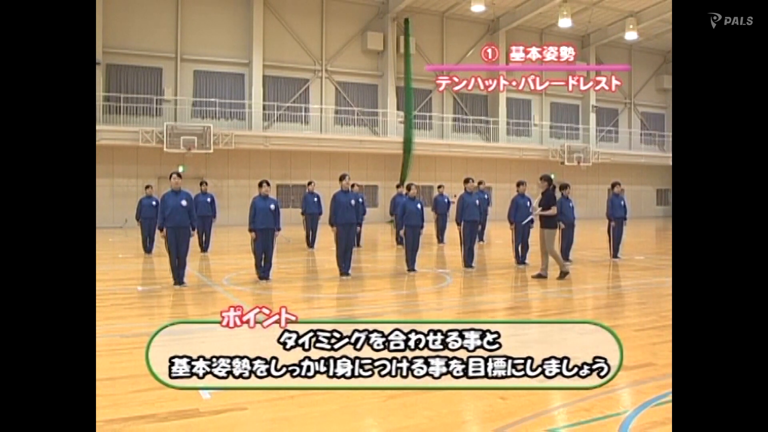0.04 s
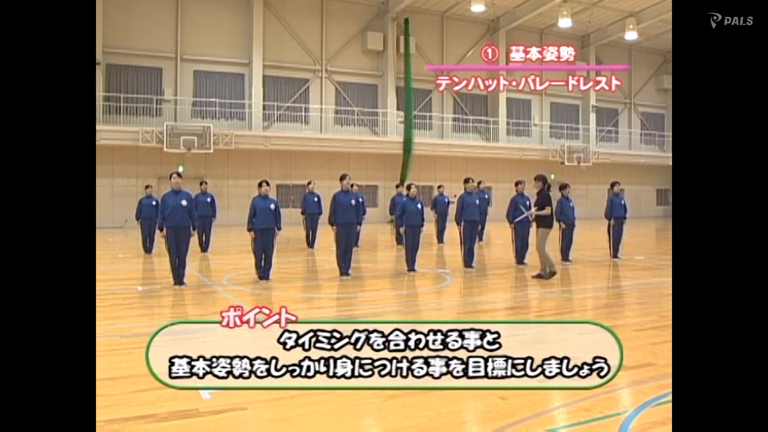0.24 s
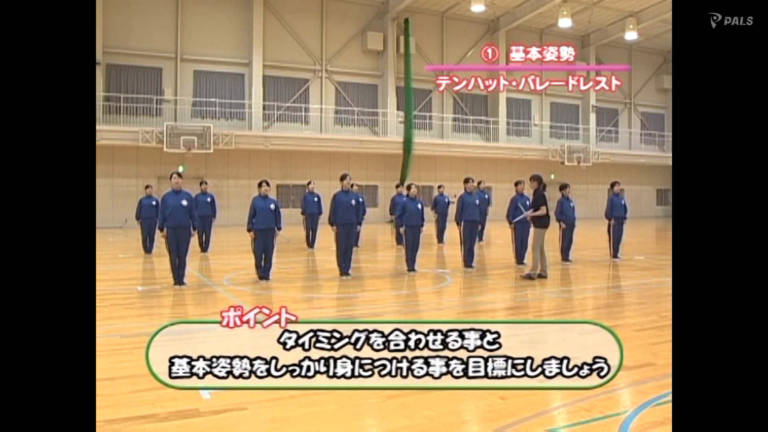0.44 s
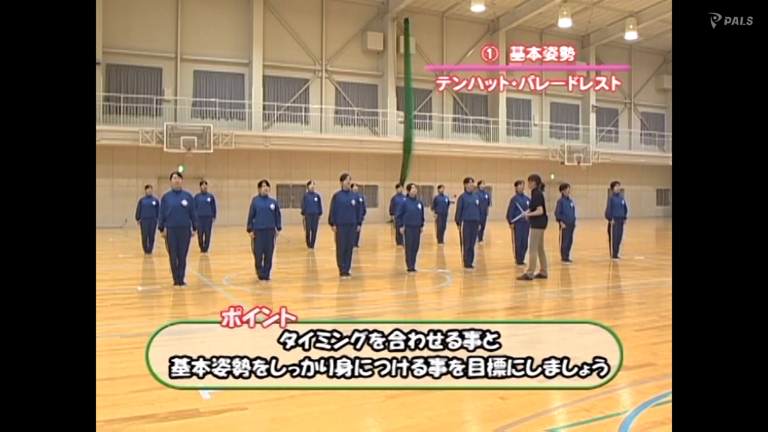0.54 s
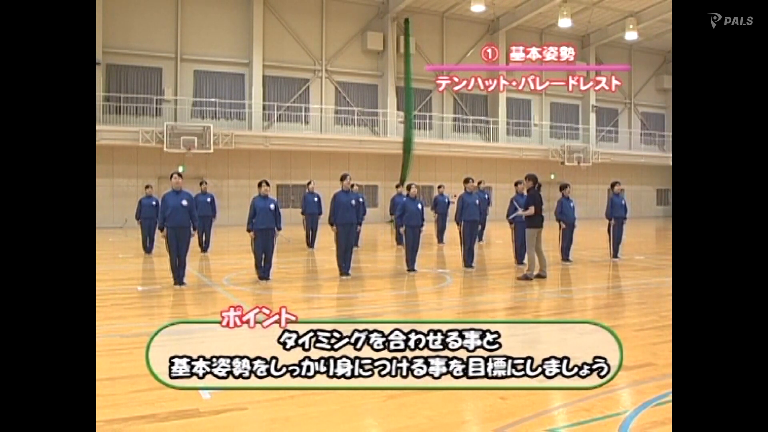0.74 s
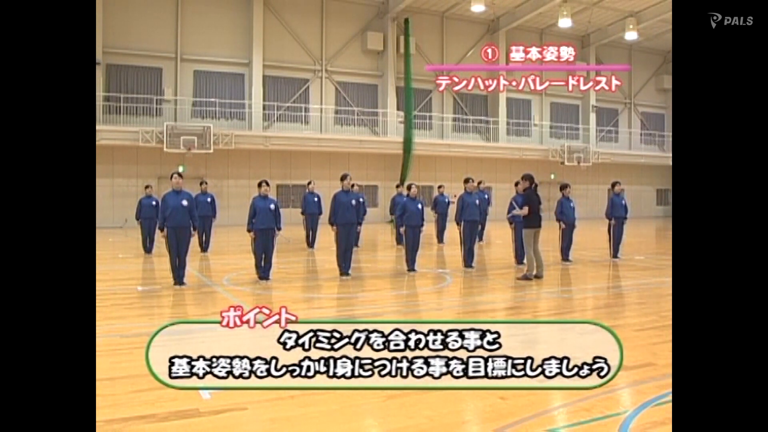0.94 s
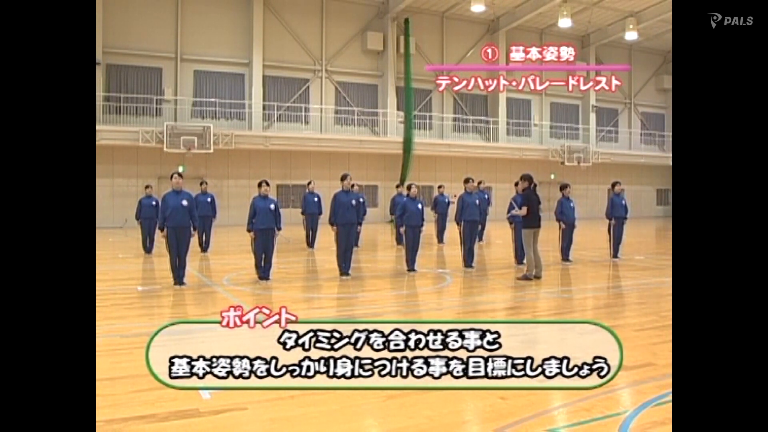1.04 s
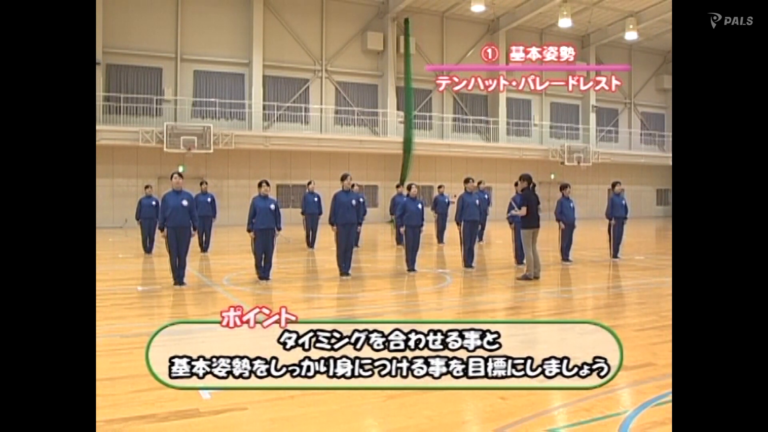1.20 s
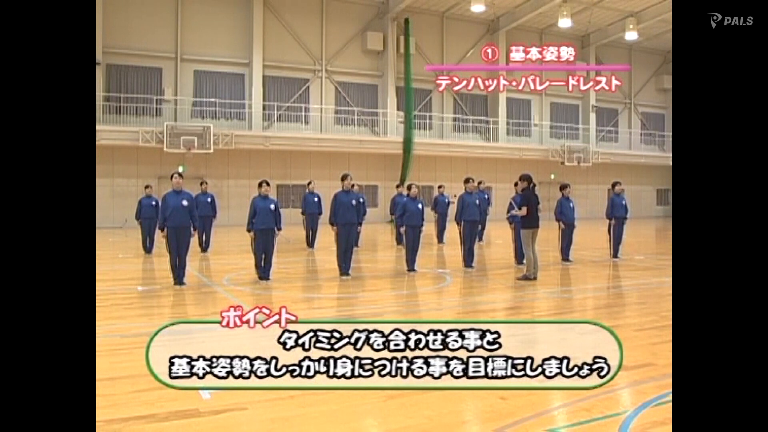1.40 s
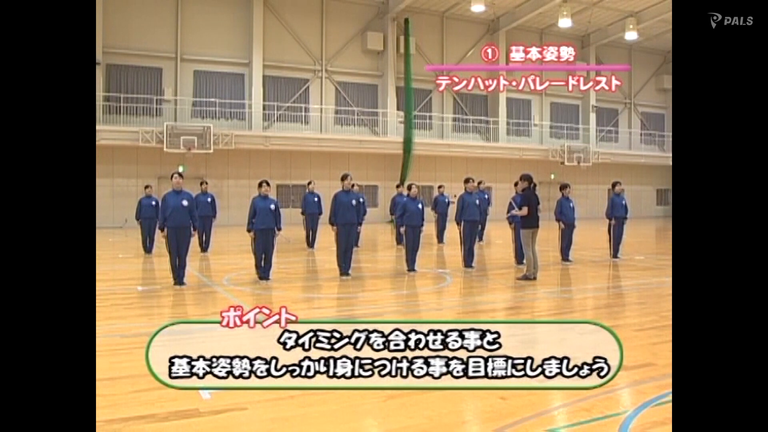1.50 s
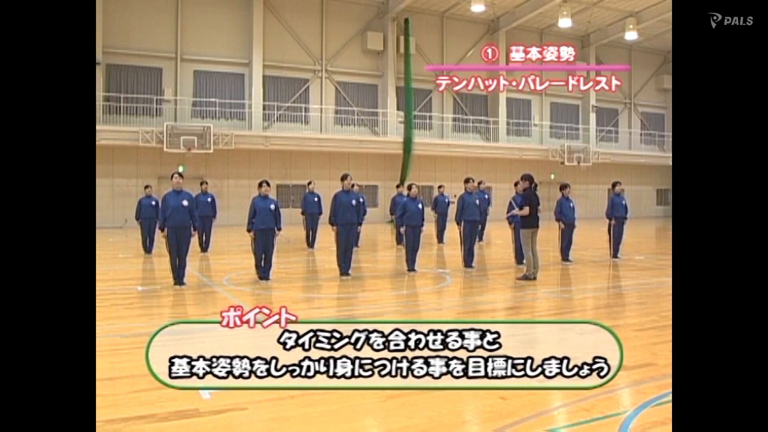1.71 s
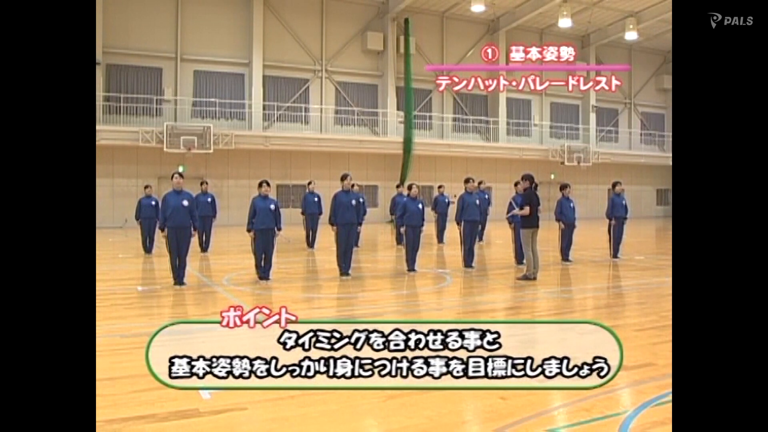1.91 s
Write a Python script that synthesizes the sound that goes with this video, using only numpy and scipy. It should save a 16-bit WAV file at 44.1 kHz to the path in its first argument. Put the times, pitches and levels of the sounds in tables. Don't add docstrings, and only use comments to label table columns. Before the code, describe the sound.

One sharp woody snap cracks close by, then rings on through a large wooden-floored gym

```python
import sys
import numpy as np
from scipy import signal
from scipy.fft import rfft, irfft
from scipy.io import wavfile
from scipy.ndimage import uniform_filter1d

SR = 44100
rng = np.random.default_rng(int(sys.argv[2]) if len(sys.argv) > 2 else 0)


def ratio(d):
    e = np.asarray(d, float) / 20
    return 10 ** e


def store_wav(level_fs):
    pcm = np.round(np.clip(np.atleast_2d(level_fs), -1, 1) * 32767)
    wavfile.write(sys.argv[1], SR, pcm.T.astype(np.int16))


N = 85995
T = np.arange(N) / SR
SNAP_S = 0.2152


def level(x, db):
    return x * ratio(db) / np.sqrt(np.mean(x ** 2))


def peak(x, db):
    return x * ratio(db) / np.max(np.abs(x))


def table(rows, hz):
    rows = np.array(rows, float)
    return np.interp(np.log(np.maximum(hz, 1)), np.log(rows[:, 0]), rows[:, 1])


def coloured(rows):
    spectrum = rfft(rng.standard_normal(N))
    shape = ratio(table(rows, np.fft.rfftfreq(N, 1 / SR)))
    return level(irfft(spectrum * shape, N), 0)


def double_band(x, hz, width_hz):
    b, a = signal.iirpeak(hz, hz / width_hz, fs=SR)
    return signal.lfilter(b, a, signal.lfilter(b, a, x))


def noise_band(hz, width_hz, db):
    return level(double_band(rng.standard_normal(N), hz, width_hz), db)


def butter(x, hz, kind="low"):
    return signal.lfilter(*signal.butter(2, hz, kind, fs=SR), x)


def fade(start_s, t60_s, rise_s):
    age = np.maximum(T - start_s, 0)
    return (1 - np.exp(-age / rise_s)) * ratio(-60 * age / t60_s)


def walk(rate_hz):
    k = int(SR / rate_hz)
    return level(uniform_filter1d(uniform_filter1d(rng.standard_normal(N), k), k), 0)


# (f/Hz, level/dB per Hz)
RUMBLE = [(18, -63.5), (30, -35.5), (113, -5.5), (152, -4), (260, -16.5), (521, -20.5), (590, -27),
          (678, -26), (1200, -50), (1560, -72.5), (2640, -120)]


def ventilation():
    rumble = coloured(RUMBLE) * ratio(-60 + 1.8 * walk(6))
    hum = noise_band(148, 60, -62.5) * ratio(2.3 * walk(12))
    return rumble + hum


# (f/Hz, level/dB per Hz)
HISS = [(590, -32), (1000, 1), (1840, -5.5), (3500, -5), (4450, -5), (5840, -7), (13500, -7.5)]


def hiss(db):
    top_hz = 14300
    edge = [(top_hz, HISS[-1][1]), (top_hz + 200, -60)]
    return coloured([*HISS, *edge]) * ratio(db)


# (t/s, peak level/dB, f/Hz, width/Hz)
FOOT_TICKS = [
    (.128, -54.5, 1136, 150),
    (.424, -47, 809.7, 1600),
    (.605, -45.5, 1200, 2800),
    (1.1065, -50.5, 760, 520),
]
# (t/s, length/s, level/dB, centre f/Hz, width/Hz)
SHUFFLES = [
    (1.142, .4, -71, 3600, 1600),
    (1.143, .37, -78, 1520, 100),
    (1.15, .22, -87, 10800, 3000),
    (1.63, .3, -73, 500, 150),
    (.13, .05, -63, 160, 70),
    (0, .22, -72, 400, 300),
    (1.15, .3, -80, 900, 500),
]


def feet():
    out = np.zeros(N)
    for start, db, hz, width in FOOT_TICKS:
        push = np.exp(-((T - start) * hz * 14) ** 2)
        out += peak(double_band(push, hz, width), db)
    for start, length, db, hz, width in SHUFFLES:
        rise = np.clip((T - start) / (0.047 * length), 0, 1)
        fall = np.clip(1.2 * (start + length - T) / length, 0, 1)
        grain = ratio(0.7 * walk(200))
        out += noise_band(hz, width, db) * rise * fall * grain
    return out


# (f/Hz, width/Hz, level/dB)
SNAP_RING = [(965.5, 50, -9.5), (1712, 74, -8.5), (1999, 72, -9), (2938, 190, -4), (3632, 77, 0.5),
             (4900, 280, -6)]
# (f/Hz, width/Hz, level/dB)
EARLIER_RING = [(813, 53, -3), (1155, 110, -4), (1650, 170, -6.5), (2000, 41, -12), (2594, 79, -5),
                (3000, 63, -10.5), (3600, 130, -10.5), (4900, 58, -23)]
# (f/Hz, level/dB per Hz)
WASH = [(240, -54.5), (400, -20), (953, -13), (1320, -19), (1970, -6.5), (2470, -10.5), (3580, -2),
        (4310, -14), (12000, -38), (15600, -67), (22000, -120)]
# (f/Hz, t60/s)
HALL_T60 = [(500, 2.2), (1000, 2.2), (2000, 2.35), (3600, 2.2), (5000, 1.8), (8000, .9), (12000, .5)]


def hall(start_s, ring, ring_db, wash_db):
    def tail(hz):
        return fade(start_s, table(HALL_T60, hz), 0.0019)

    out = np.zeros(N)
    for hz, width, db in ring:
        out += noise_band(hz, 1.5 * width, db + ring_db) * tail(hz)
    wash = coloured(WASH) * ratio(wash_db)
    for hz in 500 * 2 ** np.arange(0, 5, 0.5):
        b, a = signal.iirpeak(hz, 2, fs=SR)
        out += signal.lfilter(b, a, wash) * tail(hz)
    return out


def flutter():
    first_s, period_s, fade_s, depth_db = 0.29, 0.069, 0.35, 4
    age = T - first_s
    depth = depth_db * np.exp(-np.maximum(age, 0) / fade_s)
    return ratio(depth * np.cos(2 * np.pi * age / period_s) / 2)


# (delay t/s, level/dB, smear/s)
ECHOES = [(0.0265, -35.5, 0.0016), (.045, -53.5, 0.0056), (0.0564, -51, .003), (.063, -44.5, .004),
          (.074, -45, 0.0025), (0.133, -42.5, 0.0068), (.172, -47.5, .005), (.2, -48, .006),
          (0.271, -45.5, 0.014), (.33, -52, 0.0079), (.41, -54, .01)]


def early_echoes(x):
    reply = np.zeros(SR // 2)
    t = np.arange(len(reply)) / SR
    for lag, db, smear in ECHOES:
        decay = np.exp(-np.maximum(t - lag, 0) / smear) * (t >= lag)
        burst = rng.standard_normal(len(t)) * decay
        reply += ratio(db) * burst / np.sqrt(np.sum(burst ** 2))
    thin = signal.lfilter([2, -2 * 0.91], 1, x)
    return signal.fftconvolve(butter(thin, 10000), reply)[:N]


def floor_bounce(x):
    delay_s, db, top_hz = 0.0053, -11.5, 4570
    return ratio(db) * np.roll(butter(x, top_hz), int(delay_s * SR))


# (f/Hz, level/dB, t60/s)
WOOD = [(960, -29, 0.052), (1102, -18, 0.045), (1725, -17, 0.03), (2004, -7.5, 0.034), (2266, -33, 0.037),
        (2618, -16, 0.019), (2929, -6, 0.021), (3645, -3, 0.021), (4124, -12.5, 0.012),
        (4800, -24.5, 0.035), (5570, -20.5, 0.017), (5780, -47, 0.043), (5860, -42, 0.036),
        (6040, -35.5, 0.01733)]


def wood_ring():
    grip, contact_s = 0.85, 0.0012
    age = np.maximum(T - SNAP_S, 0)
    out = np.zeros(N)
    for (hz, db, t60), turn in zip(WOOD, rng.random(len(WOOD))):
        tone = np.sin(2 * np.pi * (hz * age + turn))
        out += ratio(db) * fade(SNAP_S, grip * t60, contact_s) * tone
    return out * ratio(1)


# (f/Hz, level/dB per Hz)
CRACK = [(180, -46.5), (300, -15.5), (1020, -1.5), (3400, -9), (4570, -15.5), (5480, -8), (6250, -19.5),
         (11300, -29.5), (15500, -40.5)]


def contact_crack():
    age = np.maximum(T - SNAP_S, 0)
    burst = coloured(CRACK) * fade(SNAP_S, 0.012, 0.00028) * ratio(-13)
    tip_hz, tip_width_hz, tip_db = 5300, 270, -22
    tips = ratio(tip_db) * np.sin(2 * np.pi * tip_hz * age) * fade(SNAP_S, 3.6 / tip_width_hz, 0.0004)
    return butter(burst, 620, "high") + tips


def thud():
    extra_hz, end_hz, sag_s = 500, 45.29, 0.0058
    age = np.maximum(T - SNAP_S, 0)
    cycles = end_hz * age + extra_hz * sag_s * (1 - np.exp(-age / sag_s))
    return ratio(-27) * np.sin(2 * np.pi * cycles) * fade(SNAP_S, 0.042, 0.0007)


# (t/s, level/dB)
GAIN = [
    (0, -8.5),
    (.21, -5.5),
    (.225, 0.5),
    (.27, -14.5),
    (.7, -8.5),
    (1.2, -3.5),
    (1.95, -1.5),
]


def gain_control():
    return ratio(np.interp(T, *np.array(GAIN).T))


def tilt(db):
    return ratio(np.array([[db], [-db]]) / 2)


def scene():
    wood, crack = wood_ring(), contact_crack()
    gain = gain_control()
    far = hall(SNAP_S + 0.058, SNAP_RING, -58, -61) * flutter()
    far += hall(-0.3, EARLIER_RING, -57.5, -66.5)
    near = wood + crack + thud() + floor_bounce(wood + crack)
    near += early_echoes(wood + ratio(5) * crack)
    near += far * ratio(11.5) * gain + feet()
    room = (ventilation() + hiss(-73.5)) * gain + hiss(-86)
    side_hiss = level(double_band(hiss(0), 9000, 4000), -104)
    side = ratio(-36) * ventilation() + side_hiss
    side -= ratio(-33.5) * np.roll(near, 2)
    return near * tilt(-0.15) + room * tilt(-0.2) + side * np.array([[1], [-1]])


def band_limit(x):
    return signal.sosfilt(signal.butter(12, 16340, fs=SR, output="sos"), x)


def record(dry):
    ceiling = 0.6
    soft = ceiling * np.tanh(dry / ceiling)
    low_cut = signal.butter(2, 48, "high", fs=SR, output="sos")
    top_cut = signal.ellip(8, 0.3, 60, 15700, fs=SR, output="sos")
    mix = signal.sosfilt(top_cut, signal.sosfilt(low_cut, soft))
    return band_limit(mix)


dry = scene()
out = record(dry)
store_wav(out)
```